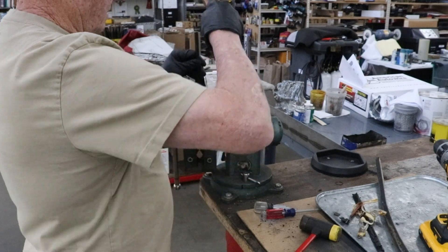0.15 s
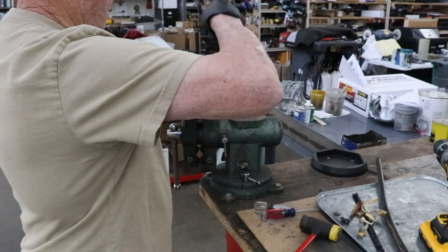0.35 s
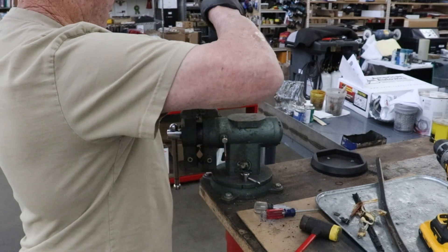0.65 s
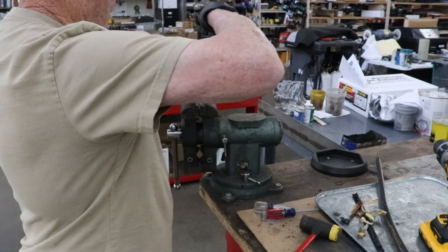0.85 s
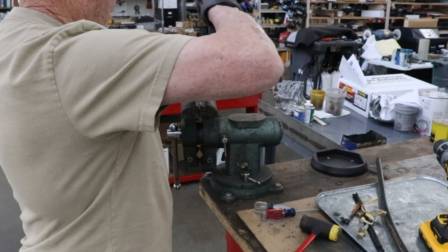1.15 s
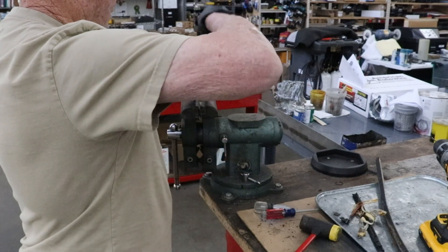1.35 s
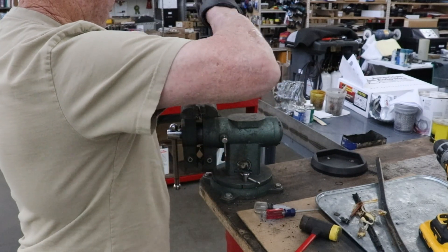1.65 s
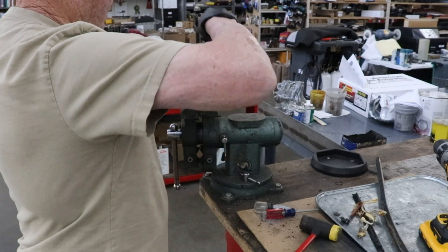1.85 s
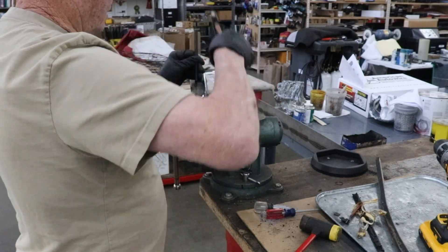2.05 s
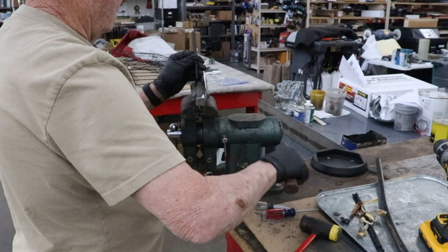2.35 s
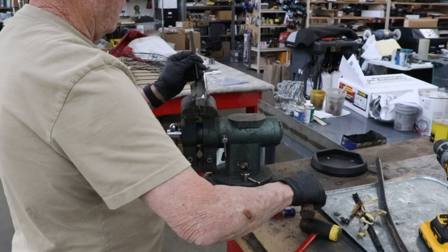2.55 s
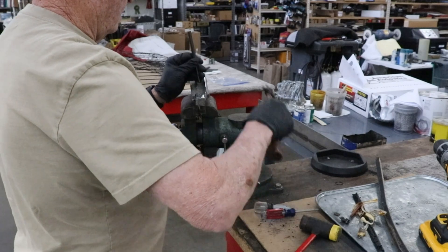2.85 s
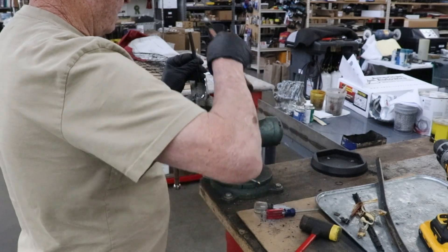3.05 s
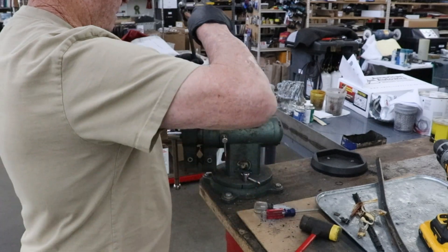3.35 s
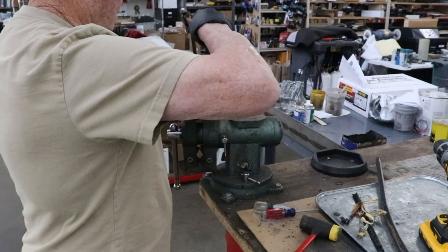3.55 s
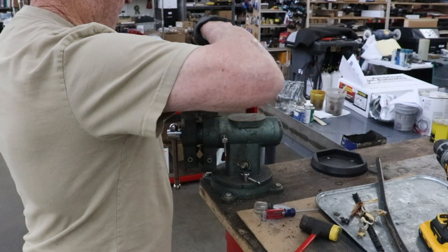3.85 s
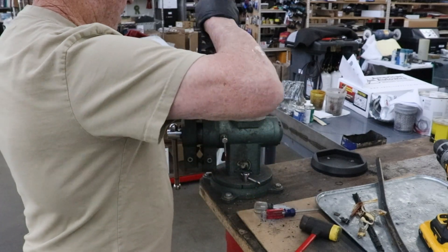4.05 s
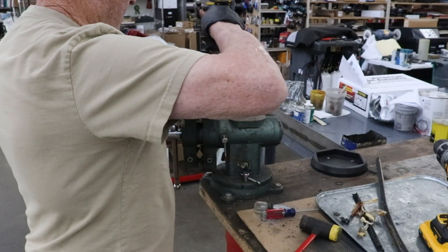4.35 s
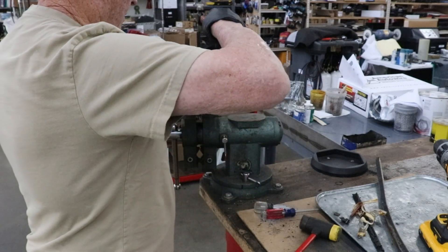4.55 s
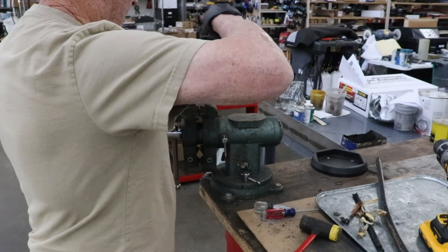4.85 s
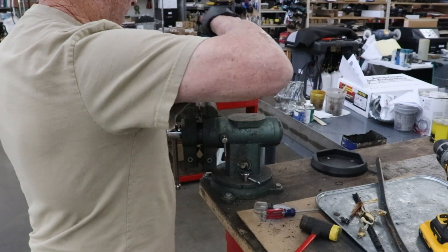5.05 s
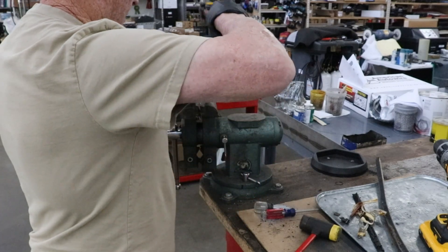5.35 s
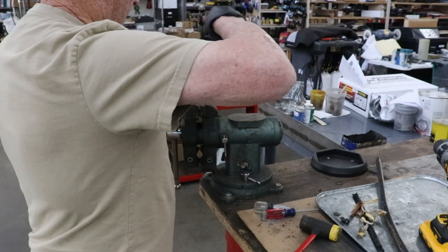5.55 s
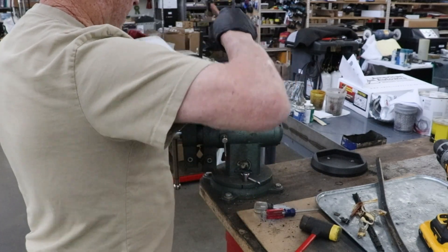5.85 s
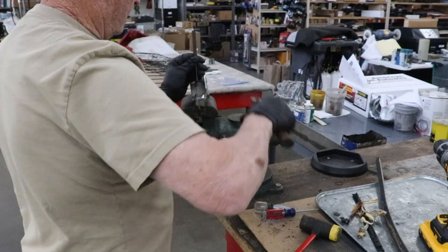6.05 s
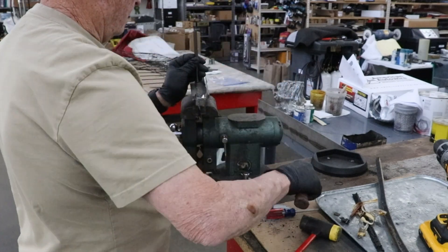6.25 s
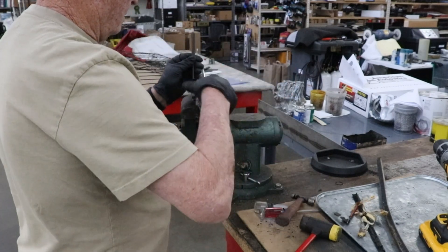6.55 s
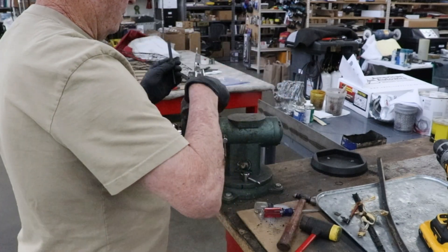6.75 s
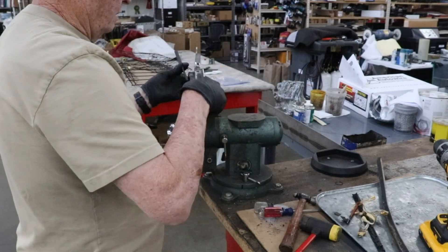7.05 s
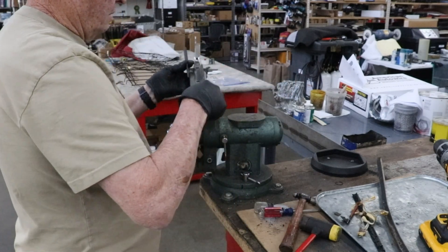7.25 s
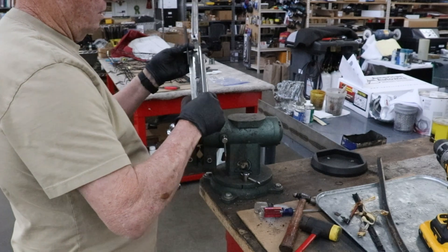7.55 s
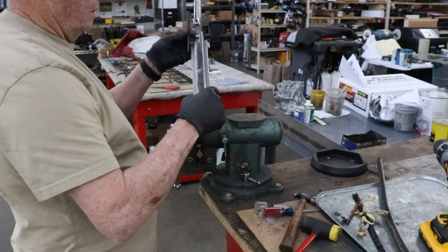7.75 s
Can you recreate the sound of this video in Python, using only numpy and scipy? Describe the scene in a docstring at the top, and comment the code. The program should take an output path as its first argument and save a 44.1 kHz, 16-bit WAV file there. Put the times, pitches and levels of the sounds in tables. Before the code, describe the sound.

Close, bright metal clangs ring briefly through a workshop as a hammer flattens a rivet in a bench vise. The blows come in two runs with a pause between, each climbing in force and pitch over dull wooden thuds. Then the hammer drops with a short rattle to the right, and the loosened vise gives quiet knocks and light handle clinks. A faint rush of ventilation continues throughout.

```python
"""Riveting at the bench vise

A workshop, stereo microphone close to the vise, ventilation behind. A hammer sets a rivet on a clamped
metal strip, in runs of blows that grow harder and ping higher as it flattens; the bench thuds, the room
rings. The hammer is dropped among the tools to the right, the vise is slackened and its loose handle
clinks. The limiter ducks under every hard blow and lets the room swell back."""
import sys
import numpy as np
from scipy import signal
from scipy.fft import rfft, irfft, next_fast_len
from scipy.io import wavfile
from scipy.ndimage import uniform_filter1d

SR = 44100
rng = np.random.default_rng(int(sys.argv[2]) if len(sys.argv) > 2 else 0)


def dump_mix(stems):
    """Bounce the given channels to the path in sys.argv[1] as a 16-bit WAV at rate SR."""
    frames = np.atleast_2d(stems).T  # one column per channel
    limited = np.clip(frames, -1, 1)  # hard clip at full scale
    pcm = np.round(limited * 32767).astype(np.int16)
    wavfile.write(sys.argv[1], SR, pcm)


N = 348651

# hammer blows; the ping climbs through each run as the rivet stiffens: t/s, level/dB, ping f/Hz
BLOWS = [(0.305, -15, 3420), (0.6154, -11.5, 3860), (0.891, -5.5, 5500), (1.1571, -3, 7140),
         (1.4057, -2, 8100), (1.6526, 0.5, 8650), (1.8836, 0.5, 8630), (3.6104, -24, 2306),
         (3.9037, -9, 3790), (4.584, -23.5, 2160), (4.8959, -7.5, 3570), (5.126, -6, 5300),
         (5.3543, -5, 5560), (5.6016, -4, 7200), (5.806, -3.5, 7140)]
FIRM_DB = -7.5  # an ordinary blow


def hammer(side_db=-3, side_hz=2600, set_hz=4200):
    """Each blow clangs the clamped steel: returns the sound at the microphone and that sent to the room."""
    # rivet, strip and hammer head pressed together: f/Hz, width/Hz, level/dB
    steel = [(1059, 148, -1), (1648, 230, 0), (2040, 140, 1), (2966, 500, -1), (3620, 850, -6),
             (4486, 440, -0.5), (5330, 440, 2.5), (7190, 500, -4), (8390, 730, -5), (10400, 550, -5),
             (13100, 650, -26)]
    # the rivet's highest mode: f/Hz, width/Hz
    squeak = (15480, 190)
    # a faint tick as the hammer lifts: t/s, level/dB, f/Hz, width/Hz
    touch = (.087, -57, 7500, 3500)
    near, thrown = np.zeros((2, N)), np.zeros(N)
    patterns = rng.standard_normal(size=(2, 4096))
    for s, db, ping_hz in BLOWS:
        # the squeak needs force, and fades as the rivet sets
        squeak_db = 1 + 0.8 * min(db - FIRM_DB, 0) - 25 * max(np.log2(ping_hz / set_hz), 0)
        modes = steel + [(*squeak, squeak_db)]
        # hard blows flex the strip, whose low modes beam at the microphone
        bend = lambda hz: amp(0.42 * (db + 9) / (1 + (hz / 2300) ** 6))
        beamed = lambda hz: rivet(hz, db, ping_hz) * resonances(modes, hz) * bend(hz)
        grind = 0.021 * amp(0.42 * db)  # harder blows grind on for longer
        mid, side = (impact(beamed, rise=.0006, chatter_t60=grind, pattern=p) for p in patterns)
        # short waves reach each capsule differently
        side = amp(side_db) * filtered(side, lambda hz: hz / np.hypot(hz, side_hz))
        add(near, s, amp(db - 5.5) * np.array([mid + side, mid - side]))
        # summed over all directions, the resonances are a little broader
        broad = [(centre, 1.3 * width, level) for centre, width, level in modes]
        spread = lambda hz: rivet(hz, db, ping_hz) * resonances(broad, hz)
        add(thrown, s, amp(db) * impact(spread, rise=1 / SR, chatter_t60=4 / SR))
    s, db, centre, width = touch
    tick = impact(lambda hz: resonances([(centre, width, 0)], hz) ** 2, rise=.001, chatter_t60=0.015)
    add(near, s, amp(db) * tick)
    return near, thrown


def rivet(hz, db, ping_hz, light_db=-16.5):
    """Colour of one blow: the rivet's resonance between two hollows, less treble from a light touch."""
    # hollow, peak, hollow: offset from the ping/octaves, half width/octaves, gain/dB
    bands = [(-0.81, 0.53, -3.5), (-0.012, 0.38, 5), (.62, 0.13, -4.5)]
    octaves = np.log2((hz + 1) / ping_hz)
    ping = sum(gain * np.exp(-((octaves - centre) / width) ** 2) for centre, width, gain in bands)
    dulling = 0.59 * min(db - light_db, 0) * np.maximum(octaves, 0)
    return amp(ping + dulling) * rebound(hz, db)


def rebound(hz, db):
    """The rivet bounces and touches again, later after a lighter blow: a comb of hollow bands."""
    share = np.interp(db, [-25, -11, -2], [.55, .33, .08])
    delay = .00037 * amp(-0.16 * (db + 13))
    return np.abs(1 + share * np.exp(-2j * np.pi * hz * delay))


def bench():
    """Each blow shoves the vise into the bench; with more force the thud levels off but gets deeper."""
    # the vise on its wooden bench: f/Hz, level/dB, t60/s
    bench_modes = [(75.7, -13.5, 0.14), (111.9, -22, 1.3), (153.96, -16, 1.3), (264, -16.5, 0.055),
                   (310, -8.5, 0.071), (359.2, -5, 0.25), (415.4, -8, 0.3), (555, -13.5, 0.15)]
    # how the thud levels off: blow level/dB, thud level/dB
    thud_curve = [(-28, -13), (-15.5, 3), (2.5, 1)]
    body = lambda hz: resonances([(319, 140, 3.0), (722.6, 500, 2.5)], hz)
    shove = lambda hz: resonances([(258, 200, 0)], hz) ** 2
    out = np.zeros(N)
    for s, db, _ in BLOWS:
        force = amp(np.interp(db, *np.transpose(thud_curve)))
        extra_db = db - FIRM_DB
        modes = [(hz, level + 0.36 * extra_db * np.log2(330 / hz), t60) for hz, level, t60 in bench_modes]
        add(out, s, force * amp(-33.5) * ring(modes, attack=0.00087))
        add(out, s, force * amp(-35.5) * impact(body, rise=0.00025, chatter_t60=0.17))
        add(out, s, amp(db - 27.5) * impact(shove, rise=.0005, chatter_t60=.012))
        sag = sagging_tone(start_hz=342.0, end_hz=185.7, length=.13)
        add(out, s + 0.025, force * amp(-54 + .9 * extra_db) * sag)
    return out


def sagging_tone(start_hz, end_hz, length):
    """A soft low tone that swells and sinks in pitch after a blow."""
    progress = np.minimum(np.arange(SR // 2) / SR / length, 1)
    hz = start_hz + (end_hz - start_hz) * progress
    return np.sin(np.pi * progress) * np.sin(2 * np.pi * (np.cumsum(hz) / SR + rng.random()))


def dropped_hammer(contacts_per_s=8000):
    """A sharp landing, then the loose tools rattle in dense tiny contacts."""
    # landing and bounces: t/s, level/dB, rattle t60/s
    drops = [(6.4671, -19.5, 0.24), (6.5529, -22.5, 0.18), (6.6364, -28.5, 0.17)]
    # spectrum of the loose tools: f/Hz, level/dB
    tools = [(40, -36.5), (130, -5), (300, -10.5), (700, -3), (1400, 0.5), (2300, -1.5), (5000, 0),
             (8000, -3.5), (13000, -7.5), (16000, -29)]
    out, t = np.zeros(N), np.arange(SR // 2) / SR
    colour = lambda hz: amp(along(tools, hz))
    for s, db, t60 in drops:
        contacts = rng.standard_normal(len(t)) * (rng.random(len(t)) < contacts_per_s / SR)
        add(out, s, amp(db - 60 * t / t60) * unit(filtered(contacts, colour)))
    add(out, drops[0][0], amp(-19.5) * impact(colour, rise=.0003, chatter_t60=.01))
    return out


def vise(widen):
    """The slack screw knocks in the casting, the handle ticks and rings; widen broadens the resonances."""
    # screw and jaws knock: t/s, level/dB, tilt/(dB per octave)
    knocks = [(6.7482, -35, -5), (6.754, -31.5, -5), (6.8284, -29.5, 5), (6.842, -27, 10),
              (6.8467, -29.5, -6.5), (6.9203, -48, -11), (7.032, -47.5, -10.5)]
    # the iron casting: f/Hz, width/Hz, level/dB
    iron = [(607, 140, -14.5), (1150, 50, -0.5), (1530, 110, -3.5), (2124, 56, -1), (2550, 160, -5.5),
            (3160, 150, 0), (3850, 98, -16), (4445, 74, -2.5), (7100, 1100, -47)]
    # the steel handle clinks in its eye: t/s, tick level/dB, ring level/dB
    clinks = [(7.1713, -41.5, -44), (7.2926, -34.5, -49), (7.302, -44, -65), (7.467, -51.5, -59),
              (7.5901, -44.5, -53), (7.7467, -55, -59.5)]
    # the eye that seats it: f/Hz, width/Hz, level/dB
    eye = [(1450, 48, 1), (1925, 44, 1.5), (3020, 130, 4), (3540, 280, 1.5), (4160, 620, -1.5),
           (6900, 1200, -10), (11300, 890, -19)]
    # the handle's free ring: f/Hz, level/dB, t60/s
    handle = [(5340, -3, .3), (10380, -9, .2)]
    out = np.zeros(N)
    soft = lambda hz: 1 / np.sqrt(1 + (hz / 11000) ** 8)
    for s, db, tilt in knocks:
        modes = [(f, widen * width, level + tilt * np.log2(f / 2000)) for f, width, level in iron]
        knock = impact(lambda hz: resonances(modes, hz) * soft(hz), rise=.0002, chatter_t60=.01)
        add(out, s, amp(db) * knock)
    for s, tick_db, ring_db in clinks:
        tick = impact(lambda hz: resonances(eye, hz) * soft(hz), rise=0.00032, chatter_t60=0.0058)
        add(out, s, amp(tick_db - 2.0) * tick)
        add(out, s, amp(ring_db) * ring(handle, attack=0.00043))
    return out


def near_walls(x):
    """Direct sound plus the slaps from bench top and shelves, different on each side."""
    # early reflections: delay/s, left level/dB, right level/dB
    walls = [(.0021, -19.5, -7), (.0064, -21, -5.5), (.0072, -19, -19), (0.0144, -16, -25.5),
             (0.02, -16.5, -23)]
    out = x * np.ones((2, 1))
    for delay, left_db, right_db in walls:
        add(out, delay, amp([[left_db], [right_db]]) * x)
    return out


def workshop(x, build_s=0.0071, renewals=40):
    """The diffuse tail of a large cluttered room, renewed as the worker moves."""
    # reverberation time: f/Hz, t60/s
    decay = [(100, 0.36), (300, 0.31), (800, 0.4), (2000, 0.66), (5000, 0.76), (9000, 0.58), (15000, 0.41)]
    # colour of the tail: f/Hz, level/dB
    colour = [(100, 1.5), (400, 11), (1000, -2), (1800, -5.5), (2600, -2), (7000, -3.5), (11000, -5.5),
              (14000, -6), (15600, -6.5)]
    out = np.zeros((2, N))
    for part in np.array_split(np.arange(N), renewals):
        hz, t, bands = signal.stft(diffuse(colour, size=SR), SR, nperseg=256)
        tail = signal.istft(bands * amp(-60 * t / along(decay, hz)[:, None]), SR, nperseg=256)[1]
        tail *= 1 - np.exp(-np.arange(tail.shape[1]) / SR / build_s)
        tail /= np.linalg.norm(tail[0])
        add(out, part[0] / SR, signal.fftconvolve(x[None, part], tail, axes=1))
    return out * amp([[-.8], [.8]])


def ventilation():
    """A steady rush of air and the low drone of a fan, wavering in pitch and level."""
    # spectrum of the air: f/Hz, level/dB
    air = [(15, -83.5), (25, -25.5), (76, -5), (89, -13), (108, -16), (161, -17), (503, -18.5),
           (560, -19.5), (840, -19.5), (1160, -29), (3520, -36.5), (4610, -37.5), (5430, -38),
           (6050, -39.5), (16000, -48)]
    # swell of the drone: t/s, level/dB
    hum = [(0.0, -55.5), (0.79, -50), (2.53, -62.5), (2.59, -50), (2.9, -58), (3.06, -46), (3.23, -68),
           (3.69, -45.5), (3.78, -56), (4.53, -45.5), (5.92, -68.5), (7.9, -75)]
    narrow_noise = filtered(rng.standard_normal(N), lambda hz: resonances([(75.0, 3.7, 0)], hz) ** 2)
    drone = np.cos(np.angle(signal.hilbert(narrow_noise)))
    drone_db = np.interp(np.arange(N) / SR, *np.transpose(hum)) - 3
    return amp(-53.5) * unit(diffuse(air, size=N)) + amp(drone_db) * unit(drone)


def diffuse(spectrum, size):
    """Stereo noise from all around: alike in the bass, unrelated in the treble."""
    # likeness at the two capsules: f/Hz, correlation
    alike = [(130, 0.98), (300, 0.94), (640, 0.7), (1400, 0.66), (3000, 0)]
    turn = lambda hz: np.arccos(np.clip(along(alike, hz), -1, 1)) / 2
    colour = lambda hz: amp(along(spectrum, hz)) * [np.cos(turn(hz)), np.sin(turn(hz))]
    mid, side = filtered(rng.standard_normal((2, size)), colour)
    return np.array([mid + side, mid - side])


def impact(colour, rise, chatter_t60, pattern=None, size=4096):
    """Contact chatter rings a body of the given colour; its energy is that of 10 ms at rms 1."""
    t, hz = np.arange(size) / SR, np.fft.rfftfreq(size, 1 / SR)
    chatter = rng.standard_normal(size)
    if pattern is not None:  # the same spot struck again answers in much the same way
        chatter = pattern + chatter
    burst = rfft(chatter * (1 - np.exp(-t / rise)) * amp(-60 * t / chatter_t60))
    burst /= np.sqrt(uniform_filter1d(abs(burst) ** 2, size=90))  # hard contact feeds all bands evenly
    # minimum phase: the body rings only after it is struck
    cepstrum = irfft(np.log(np.maximum(colour(hz), 1e-4)))
    cepstrum[1:size // 2] *= 2
    cepstrum[size // 2 + 1:] = 0
    x = irfft(burst * np.exp(rfft(cepstrum)))[:size // 2]
    return x / np.linalg.norm(x) * np.sqrt(SR / 100)


def ring(modes, attack):
    """Free modes (f/Hz, level/dB, t60/s), struck at slightly new strengths each time."""
    t = np.arange(SR) / SR
    tones = np.zeros(SR)
    for hz, db, t60 in modes:
        envelope = amp(db + rng.uniform(-1.1, 2.3) - 60 * t / t60)
        tones += envelope * np.sin(2 * np.pi * (hz * t + rng.random()))
    return tones * (1 - np.exp(-t / attack))


def resonances(modes, hz):
    """Gain of overlapping resonances (f/Hz, width/Hz, level/dB)."""
    powers = (amp(db) ** 2 / (1 + ((hz * hz - f * f) / (hz * width + 1e-9)) ** 2)
              for f, width, db in modes)
    return np.sqrt(sum(powers))


def amp(db):
    """Decibels to gain."""
    return 10 ** (np.asarray(db) / 20)


def unit(x):
    """Scale to rms 1."""
    return x / np.sqrt(np.mean(x ** 2) + 1e-20)


def along(points, hz):
    """Read (f/Hz, value) points on a log axis."""
    f, values = np.transpose(points)
    return np.interp(np.log(hz + 1), np.log(f + 1), values)


def add(track, s, sound):
    """Mix a sound into a track at time s."""
    i = round(s * SR)
    track[..., i:i + sound.shape[-1]] += sound[..., :N - i]


def filtered(x, response):
    """Shape x by a gain that depends on frequency."""
    n = x.shape[-1]
    padded = next_fast_len(n + 8192)
    return irfft(rfft(x, padded) * response(np.fft.rfftfreq(padded, 1 / SR)), padded)[..., :n]


def scene():
    """From the microphone: blows and vise close ahead, the dropped hammer to the right, room all round."""
    clang, thrown = hammer()
    thud, drop = bench(), dropped_hammer()
    handling, handling_thrown = vise(widen=1), vise(widen=6)
    drop_right = np.array([amp(-4.5) * np.roll(drop, 2), amp(4.0) * drop])  # later and weaker on the left
    near = near_walls(clang) + thud + drop_right + near_walls(handling) * amp([[-2], [-.5]])
    into_room = amp(-14.0) * thrown + amp(-10.5) * thud + amp(-11) * drop + amp(-15) * handling_thrown
    return near + workshop(into_room) + ventilation()


def limiter(x, threshold_db, release_db_per_s, attack_s):
    """The gain drops quickly under a loud sound and recovers at a steady rate."""
    power = np.abs(uniform_filter1d(np.max(x ** 2, axis=0), size=88))
    over_db = np.maximum(10 * np.log10(power + 1e-12) - threshold_db, 0)
    recovery_db = release_db_per_s * np.arange(N) / SR
    held_db = np.maximum.accumulate(over_db + recovery_db) - recovery_db
    pole = np.exp(-1 / (attack_s * SR))
    return x * amp(-signal.lfilter([1 - pole], [1, -pole], held_db))


def record(dry, top_hz=15800):
    """After the microphone: limiter, soft overload of the sharpest peaks, band limit."""
    x = limiter(dry, threshold_db=-7.0, release_db_per_s=80, attack_s=0.0017)
    x = x / (1 + np.abs(x / .92) ** 6) ** (1 / 6)
    return filtered(x, lambda hz: 1 / np.sqrt(1 + (hz / top_hz) ** 160))


dry = scene()
out = record(dry)
dump_mix(out)
```